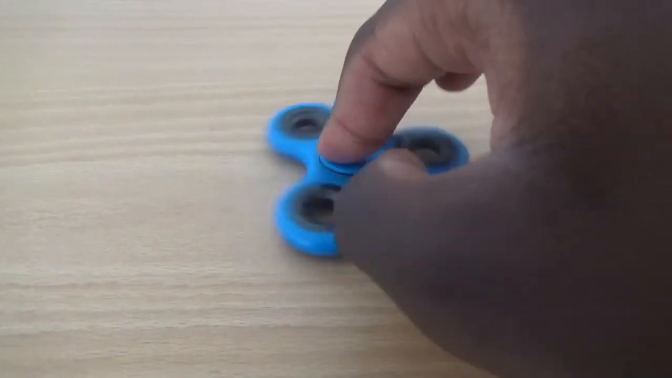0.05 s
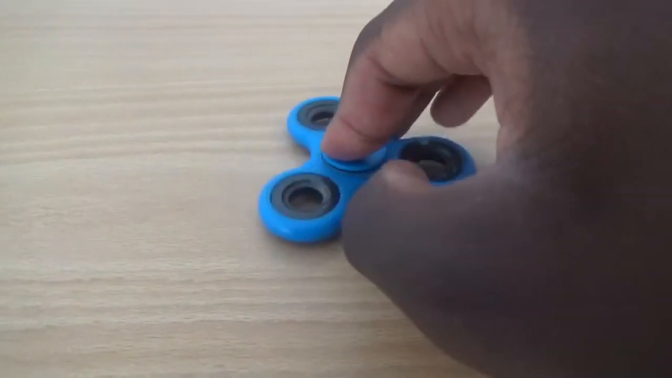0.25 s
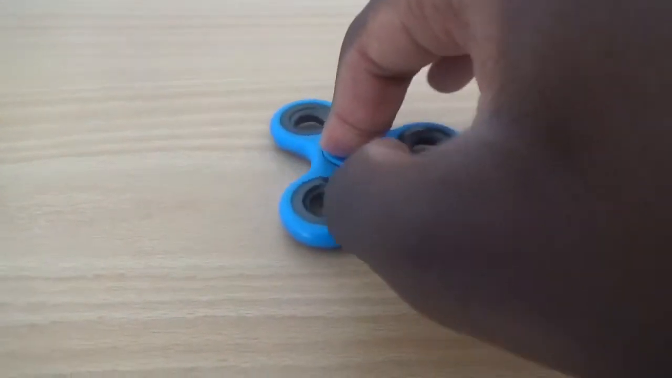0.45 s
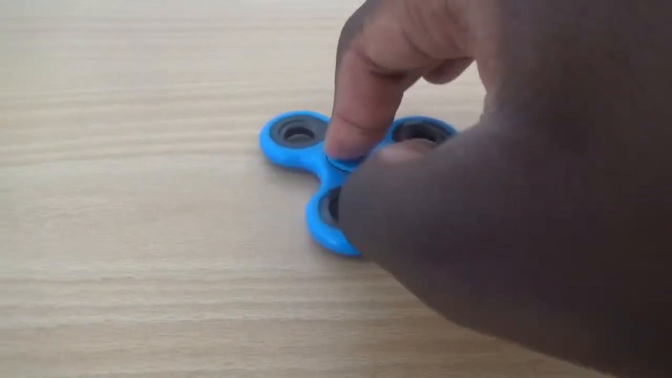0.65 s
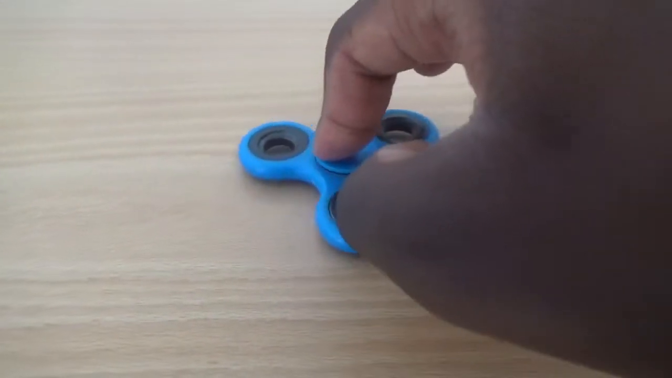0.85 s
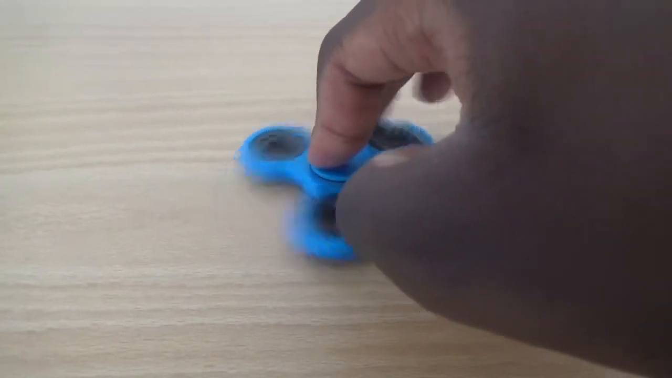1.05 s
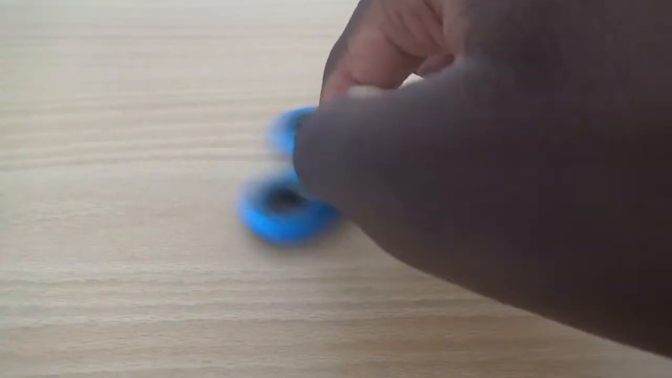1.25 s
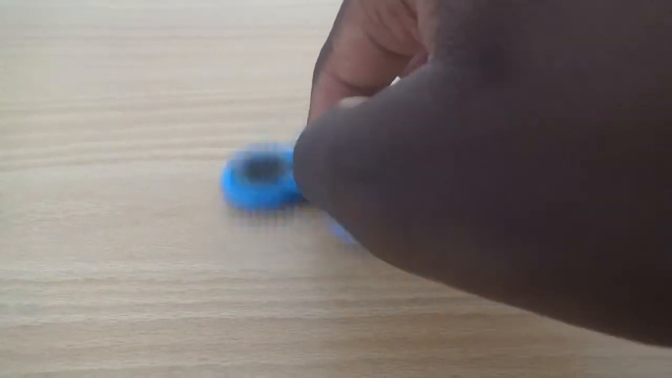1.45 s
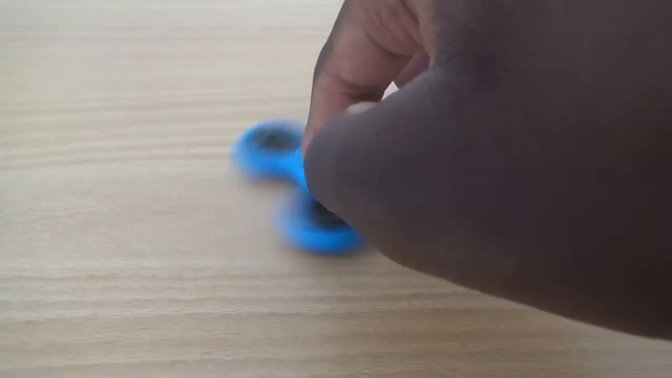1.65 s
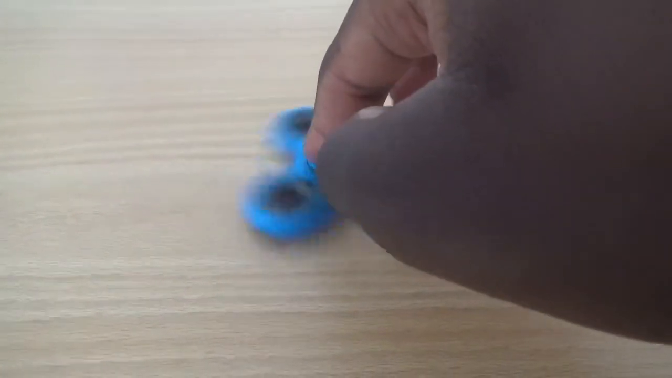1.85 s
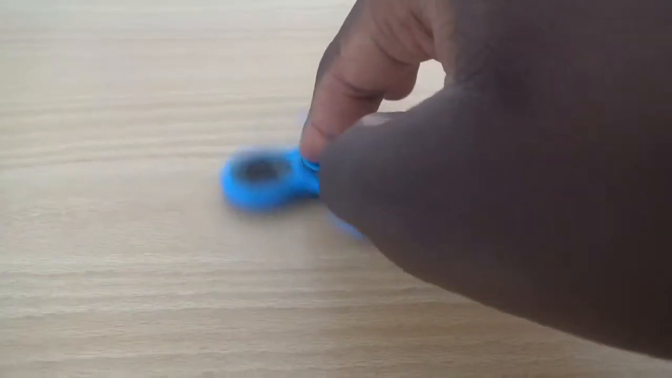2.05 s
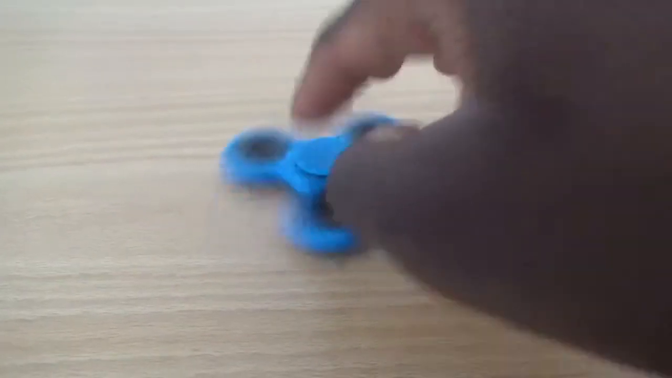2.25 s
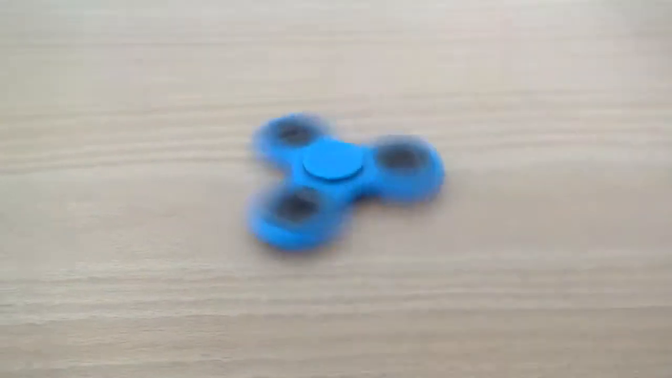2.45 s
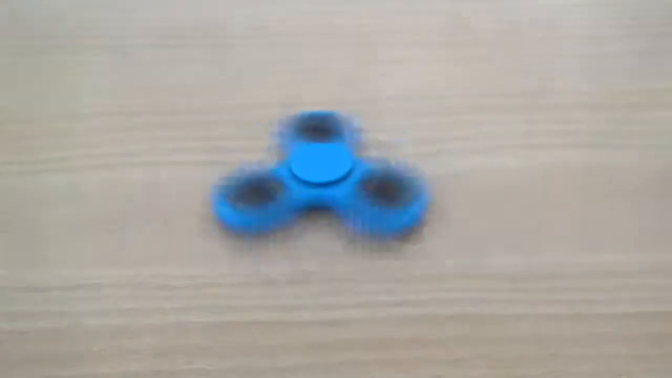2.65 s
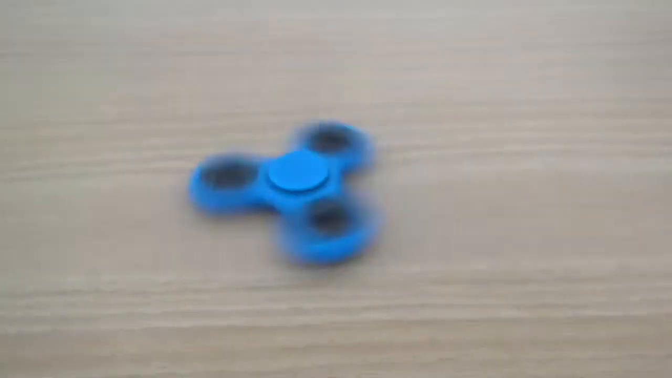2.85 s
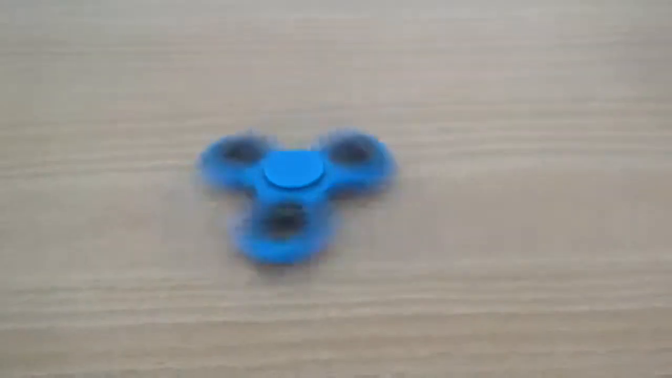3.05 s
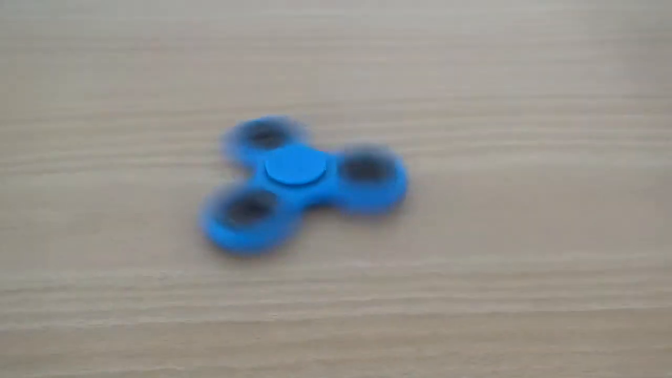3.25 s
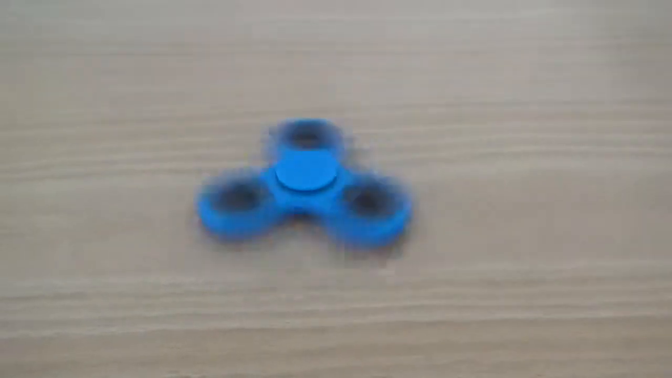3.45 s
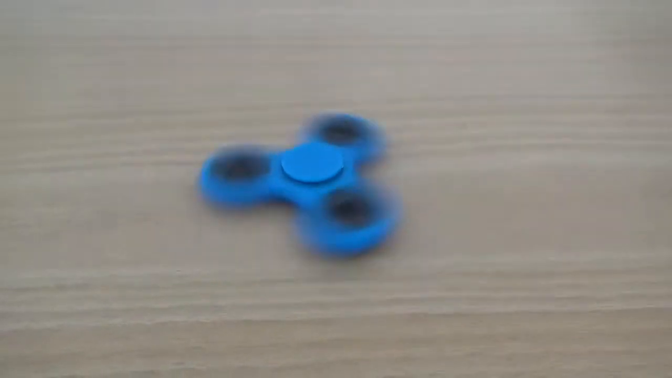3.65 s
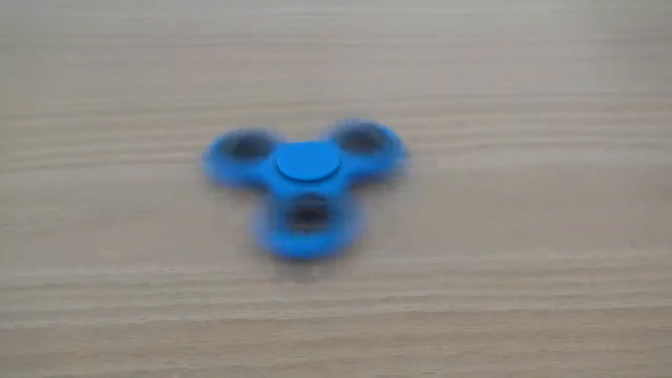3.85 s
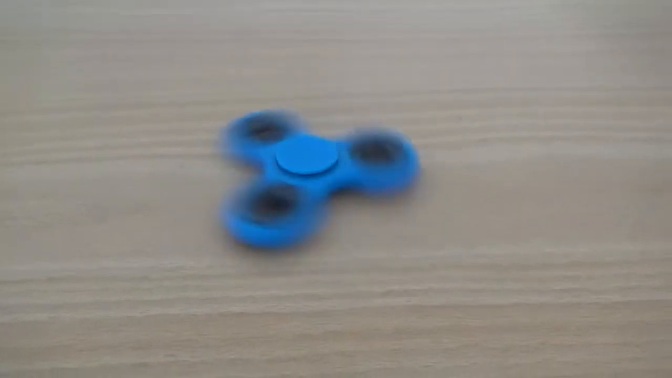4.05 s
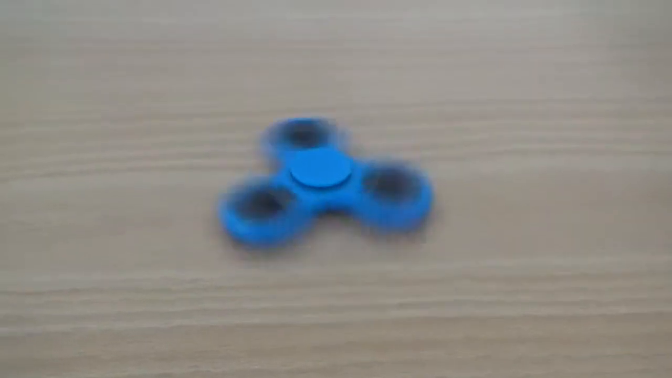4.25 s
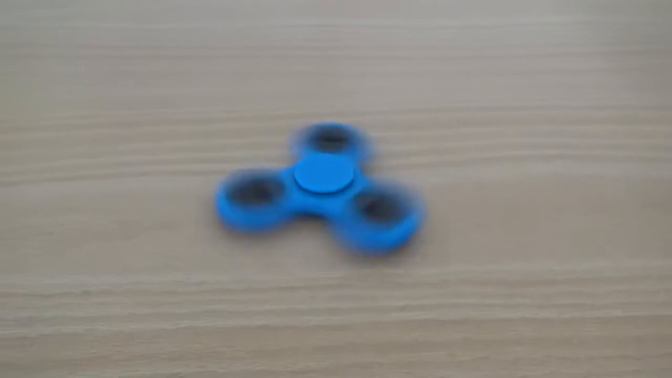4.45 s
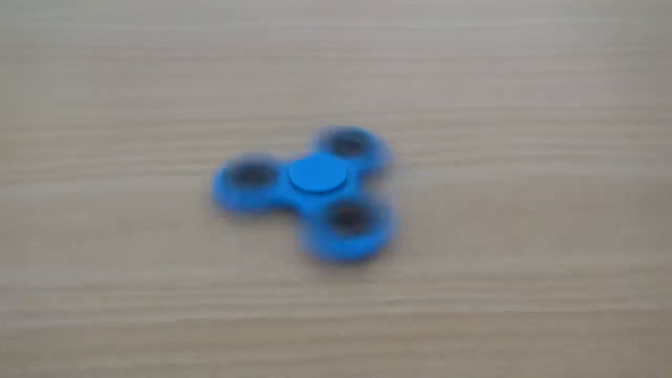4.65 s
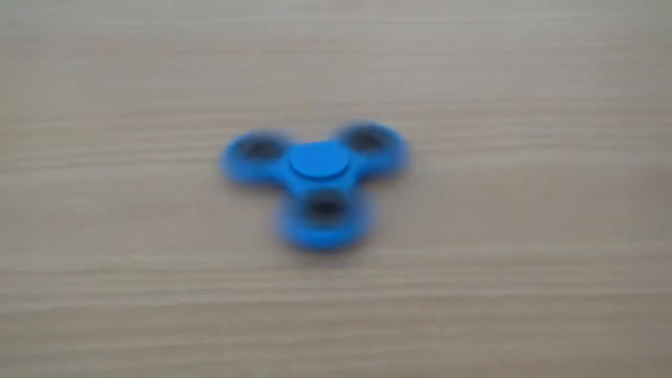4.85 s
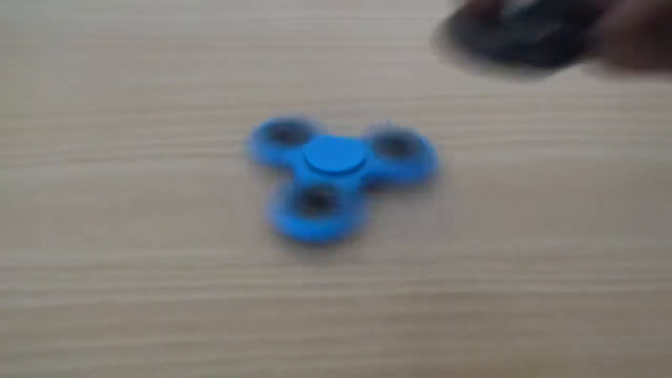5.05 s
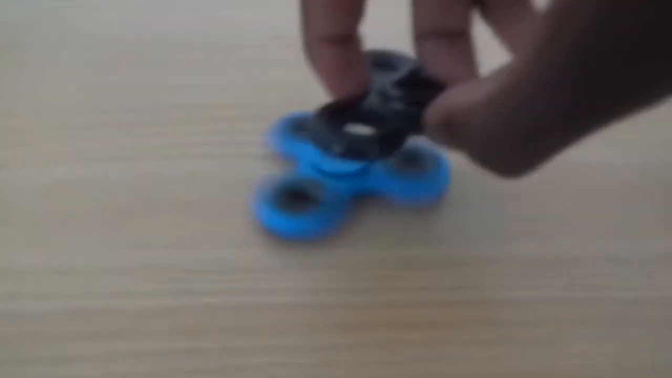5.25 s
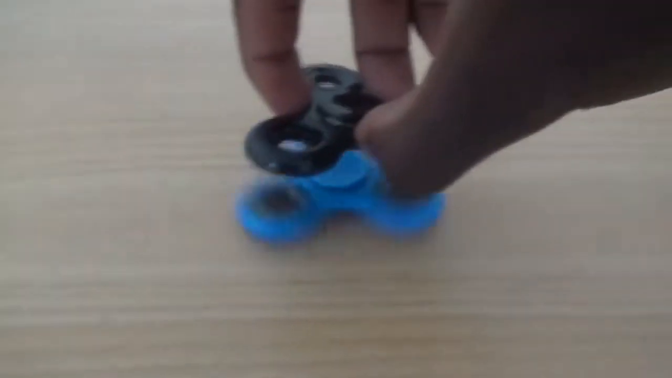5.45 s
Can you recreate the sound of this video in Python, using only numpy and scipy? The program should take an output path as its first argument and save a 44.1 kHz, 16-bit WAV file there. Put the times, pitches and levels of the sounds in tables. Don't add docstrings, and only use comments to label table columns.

```python
import sys
import numpy as np
from scipy import signal
from scipy.fft import rfft, irfft
from scipy.io import wavfile
from scipy.ndimage import uniform_filter1d

SR = 44100
rng = np.random.default_rng(int(sys.argv[2]) if len(sys.argv) > 2 else 0)


def volts_from_db(level):
    exponent = np.asarray(level, float) / 20
    return 10 ** exponent


def wav_out(sig):
    wavfile.write(sys.argv[1], SR, np.round(np.clip(np.atleast_2d(sig).T, -1, 1) * 32767).astype(np.int16))


N = 243431
TIME = np.arange(N) / SR
HZ = np.fft.rfftfreq(N, 1 / SR)

# time_s, pressure_0_to_1, drag_along_wood_0_to_1
FINGER = [
    (0, 1, 0.84),
    (.5, 0.9, 0.8),
    (.9, 0.89, 0.01),
    (2.04, 0.76, 0.02),
    (2.09, 0, 0.26),
    (2.13, 0.98, 0.03),
    (2.22, 0.64, 0),
    (2.32, 0.05, 0.19),
    (5.52, 0.09, 0),
]
# time_s, level_db
RATTLE = [(1.0, -33), (1.06, -17), (1.09, -5), (1.16, -2.5), (1.6, -1), (1.9, -0.5), (2.2, -0.5), (2.45, 1),
          (2.8, 0.5), (3.05, -0.5), (3.3, 0.4), (3.8, 0.5), (4.6, -0.57), (4.9, -1.5), (5.15, 0.05),
          (5.4, 1.5), (5.45, -1), (5.52, -0.5)]
# time_s, change_db, length_s
ROCKS = [(1.03, 22.5, 0.038), (1.154, 3, 0.054), (1.256, 5, 0.093), (1.373, 4.5, 0.037), (1.497, 5, 0.05),
         (1.613, -6.5, 0.22), (1.766, 4.5, 0.11), (1.818, 0.5, .06), (1.9, 0.5, .05), (2.174, 4, 0.047),
         (2.24, -0.5, .04), (2.326, 0.5, 0.046), (3.462, 5, .06), (3.72, 0.5, 0.074), (3.873, 0, .05),
         (4.615, 2.5, 0.046), (4.7, 3, 0.065), (4.856, 1, 0.036), (5.006, 2, 0.046), (5.266, 2, .05),
         (1.95, -6.5, 0.044), (2.02, 3.5, 0.046), (2.427, 2.5, 0.097), (2.66, 4, 0.09), (2.81, 4.5, 0.017),
         (2.954, 5, 0.092), (3.18, 4.5, 0.13), (3.295, 2, 0.072), (3.35, 6, 0.071), (3.518, -3, 0.032),
         (3.606, 5.5, 0.058), (3.96, -4, 0.025), (4.065, 4.5, 0.045), (4.257, 2, 0.15), (4.39, -5, 0.05),
         (4.424, 6.5, 0.021), (4.807, 0.5, 0.044), (5.057, -4, 0.035), (5.125, 4, 0.085),
         (5.398, 3.5, 0.034), (5.443, -5, 0.034), (5.484, 3, .04)]
# pitch_hz, width_hz, finger_on_db, let_go_db
RACE_MODES = [(5140, 1000, -9, -11), (5796, 190, -2, -5), (6174, 280, -1, 0), (6500, 180, 4, -5.5),
              (6800, 210, 0.5, -3), (7220, 390, -1.5, -1), (7720, 220, -2, 5), (8080, 720, -1.5, 3),
              (8610, 300, 0, 0), (8900, 430, -5, -0.5), (9600, 1400, -6, -1), (9950, 160, -3, 0.5),
              (10440, 1020, -6.5, -2), (11020, 230, 4, -8)]
CAP_MODES = [(1378, 36, -4, -3), (1649, 89, -1.5, -5), (1877, 34, -2, -11.5), (2110, 120, -8, -5.5),
             (2273, 55, 1.5, 3), (2580, 140, -10.5, -9), (2860, 340, -16, -12.5), (3000, 440, -8.5, -15.5),
             (4200, 800, -9.5, -10), (4510, 66, -30, -17)]
PANEL_MODES = [(382, 70, -1, -3.5), (425, 37, -9, -5), (532, 21.3, 5.5, 1.5), (599, 26, -2.5, -1),
               (665, 49, -5.5, -10), (747, 30, 4, -1.5), (834, 36, -10, -6), (932.6, 43.6, 0, 0.5),
               (982, 28, -11, -6), (1122, 12, -9, -33)]
TABLE_MODES = [(177.5, 7.5, -24, -16), (212, 7.3, 0, 2.5), (239.5, 14.5, -6.5, 3.5),
               (260.1, 9.9, 3.5, -1.5), (322, 12.3, -8.5, -18), (343.5, 11, -13, -7)]
# pitch_hz, width_hz, finger_on_db, let_go_db
DRAG_MODES = [(205, 26, -12.5, -9), (274, 24, 0, -1), (343, 18, -27, -16)]
# time_s, pitch_hz
RESTING_SPOT = [(1.03, 216), (1.2, 255), (1.95, 250), (2.05, 220), (2.18, 252), (2.7, 241), (2.95, 220),
                (3.15, 243), (3.26, 210), (3.39, 212), (3.46, 256), (3.6, 214), (3.8, 238), (3.95, 212),
                (4.1, 238), (4.24, 218), (4.43, 254), (5.52, 243)]
# time_s, peak_db, pitch_hz, fade_by_60_db_s
TICKS = [(0.196, -39, 8200, 0.0099), (1.0879, -33, 6940, .02), (1.1014, -28.5, 6240, .018),
         (1.199, -25, 8360, .009), (1.26, -26, 10500, .01), (1.3756, -25, 10600, 0.011),
         (1.4331, -27.5, 8360, 0.012), (1.916, -20, 9100, 0.0053), (1.9813, -25, 6880, .012),
         (2.024, -25, 8900, .018), (2.2614, -26.5, 7760, .012), (2.296, -26.5, 10300, 0.016),
         (2.4384, -25, 7970, 0.017), (2.534, -27, 8300, 0.018), (2.5626, -24, 9700, 0.015),
         (2.674, -23.5, 9500, 0.046), (2.776, -29, 9950, 0.046), (2.919, -24, 9000, 0.034),
         (3.2233, -27, 9400, 0.017), (3.585, -26, 7850, 0.028), (3.715, -33, 7950, 0.024),
         (3.7705, -28, 9300, .03), (3.9923, -27.5, 8600, 0.022), (4.179, -25.5, 9600, 0.02),
         (4.43, -25, 10400, 0.016), (4.5535, -29, 9850, .02), (4.582, -27, 8100, 0.02),
         (5.3772, -23, 8500, .014), (5.4015, -22.5, 7800, 0.012), (5.4804, -28, 7550, .023)]
# time_s, peak_db, pitch_hz
TAPS = [(1.9064, -24, 8420), (2.381, -26, 10400), (2.5958, -24, 7950), (2.7139, -29, 7860),
        (2.7309, -25, 7890), (2.7965, -21.5, 9920), (2.8774, -31, 7820), (3.0719, -28, 7810),
        (3.3373, -25, 7780), (3.55, -24, 7720), (3.6129, -35, 8540), (3.6239, -24, 10400),
        (3.6875, -28, 7820), (3.8731, -27, 7910), (3.8935, -26, 9220), (3.9419, -29, 7840),
        (4.12, -24, 7740), (4.25, -27, 7800), (4.2697, -25, 7770), (4.3944, -25, 8150), (4.5072, -25, 8360),
        (4.6189, -29, 7890), (4.6324, -25, 8190), (4.6803, -29, 8130), (4.7077, -33, 8300),
        (4.8354, -30, 8080), (4.9486, -30, 7700), (4.9576, -28, 8200), (5.0814, -29, 9820),
        (5.2086, -27, 7700), (5.3043, -24, 7700), (5.3542, -31, 8670), (5.366, -24, 8570)]
# time_s, peak_db, pitch_hz, width_hz, fade_by_60_db_s
CLACKS = [(.9128, -51, 6000, 3000, 0.013), (1.0166, -49, 6470, 2000, .02), (1.0294, -53, 6600, 2000, .02),
          (.061, -37.5, 4040, 900, 0.017), (.062, -42, 3000, 1200, 0.024), (1.145, -30.5, 9500, 910, 0.015),
          (1.755, -51, 6560, 500, 0.034), (1.322, -34.5, 4560, 695, 0.024), (2.055, -35, 4460, 1200, .03),
          (3.219, -34, 2240, 300, 0.08), (3.345, -31, 4550, 2000, 0.0089),
          (3.588, -23.5, 5400, 2590, 0.012), (2.677, -30.5, 3900, 1800, 0.017),
          (2.463, -23, 8000, 5000, 0.0048), (3.713, -32.5, 6800, 600, 0.015),
          (3.772, -32, 6200, 400, 0.037), (4.144, -32.5, 2240, 200, 0.037), (4.43, -34, 4240, 2040, 0.013),
          (5.148, -37, 3000, 2500, 0.02), (5.403, -30, 6500, 900, 0.028), (5.482, -31.5, 6500, 800, .03)]
# time_s, peak_db, pitch_hz, width_hz, fade_by_60_db_s
KNOCKS = [(1.02, -39, 215, 50, 0.052), (1.2, -42, 242, 50, .04), (1.8, -33, 260, 73, 0.0087),
          (3.1452, -20, 463, 530, 0.0094), (3.1462, -33, 1020, 790, .008), (3.591, -41, 1850, 300, .03),
          (1.15, -32, 560, 160, 0.099), (2.9, -34, 340, 51, 0.16), (3.165, -33, 452, 150, 0.069),
          (3.22, -37, 390, 120, 0.087), (0.093, -36, 288, 61, 0.045), (0.0102, -41, 287, 79, 0.042),
          (3.131, -30, 174, 73, 0.029), (3.14, -44.5, 76, 40, 0.23), (3.185, -50, 69.6, 40, .08),
          (4.03, -52, 70, 40, 0.07), (3.66, -36.5, 150, 50, 0.091), (4.15, -38, 173, 40, .12),
          (2.1, -41, 124, 65, 0.051), (3.343, -27, 205, 62, 0.037), (3.588, -27.5, 205, 62, 0.025),
          (4.42, -32, 252, 55, 0.01), (6.2, -27, 230, 55, .01)]
# time_s, pitch_hz, level_db
HAND_GAP = [
    (4.98, 5450, -73),
    (5.03, 5250, -59),
    (5.1, 4800, -61),
    (5.2, 4550, -63),
    (5.35, 4470, -66),
    (5.45, 4380, -78),
]
# time_s, level_db
JOLTS = [(2.27, -51), (2.48, -60), (3.14, -40.5), (3.23, -47), (3.4, -49), (3.5, -44), (3.67, -41),
         (3.94, -49), (4.05, -53), (4.22, -45.5), (4.41, -54), (5.17, -54)]
# pitch_hz, difference_db
LEAN_DB = [(300, 0), (800, 0), (1150, -2.5), (1500, .5), (3500, 1), (5850, 7), (7300, 1.8), (8800, .2)]
# pitch_hz, lead_radians
LEAD = [(100, 0), (1000, -.2), (2000, .1), (5200, .7), (6000, -.8), (6400, -.55), (8200, -.35),
        (8450, -.07)]
# pitch_hz, likeness_0_to_1
SPINNER_ALIKE = [(300, .997), (700, .9), (1200, .45), (2300, .8), (4300, .74), (5750, .5), (6200, .82),
                 (8600, .97)]
# start_s, rise_s, hold_s, fall_s, pitch_hz, level_db, left_minus_right_db
LENS_STEP = [
    (0, 0.0055, .0005, .0025, 3830, -59, -2),
    (0, 0.003, 0.0088, 0.0042, 4190, -54, 3.5),
    (.005, 0.007, 0.0017, .005, 2105, -59, 14),
]
# time_s, level_db
LENS_LEVEL = [(.09, -3), (.13, 1), (1.0, -0.5), (1.2, -1), (2.0, 1), (3.0, -2), (4.0, -5), (5.5, -1)]
# pitch_hz, level_db
FAN = [(37.6, -65.5), (75, -69), (88.3, -71), (176.5, -61.5), (264.8, -65), (353, -62), (447, -70),
       (541, -71), (728, -69), (803, -66)]
# pitch_hz, level_db_per_hz
AIR = [(25, -4), (50, -18), (90, -19.5), (150, -22), (300, -4), (600, 0.5), (950, 5), (1100, -45),
       (1600, -11.5), (2600, -6), (3400, -12.5), (6000, -15.5), (11000, -24.5)]
# pitch_hz, likeness_0_to_1
AIR_ALIKE = [(60, 0), (270, 0.2), (570, 0.2), (1200, 0.9), (2500, 0), (5300, 0.02), (11000, 0.9)]
# pitch_hz, width_hz, level_db
ROOM_RING = [(790, 210, -63), (900, 49, -63.5), (1362, 65, -62)]


def spinner():
    s, *columns = np.transpose(FINGER)
    press, drag = (np.clip(np.interp(TIME, s, column), 0, 1) for column in columns)
    flurry = volts_from_db(0.47 * walk(30.16))
    balls = rattle(1500, 2.73, 16, flurry, contact_s=0.00017)

    race = body(RACE_MODES, balls + .5, press, 2.0, count=2)
    cap = body(CAP_MODES, balls + 1.14, press, 2.0)
    panel = body(PANEL_MODES, balls + 2.2, press, 1.0)
    spot_hz = np.interp(TIME, *np.transpose(RESTING_SPOT))
    resting = body(TABLE_MODES, balls + 5.3, press, 0.37, near_hz=spot_hz)
    sliding = body(DRAG_MODES, 1, press, 1.2)
    table = (1 - drag) * resting + drag * sliding

    out = feed(press, free_db=-43.5, held_db=-3.5, share=0.2, nudge_db=-64, rest_db=-74.5) * race
    out = out + feed(press, free_db=-48.5, held_db=-3.5, share=0.06, nudge_db=-83, rest_db=-66) * cap
    out = out + feed(press, free_db=-47.5, held_db=8.5, share=0.12, nudge_db=-51, rest_db=-59.5) * panel
    out = out + feed(press, free_db=-38.5, held_db=0, share=1.2, nudge_db=-42, rest_db=-65) * table
    out = out + ticks(press)
    out = out + strikes(CLACKS, True, rise_s=0.0013)
    out = out + strikes(KNOCKS, False, rise_s=0.00057)
    return out + hollow(balls + 1.1)


def rattle(per_s, scatter_db, hardest_db, flurry, contact_s):
    size_db = np.minimum(scatter_db * rng.exponential(size=N), hardest_db)
    hits = (rng.random(N) < per_s / SR) * volts_from_db(size_db)
    contact = np.exp(-.5 * (np.arange(-128, 129) / (contact_s * SR)) ** 2)
    return unit(np.abs(signal.fftconvolve(hits, contact, "same")) * flurry)


def body(modes, force, press, flicker_db, count=1, near_hz=None):
    held, free = 0, 0
    for hz, width, held_db, free_db in modes:
        tone = force * volts_from_db(flicker_db * walk(25.02)) * rng.standard_normal(N)
        for _ in range(count):
            tone = ring(tone, hz, width)
        if near_hz is not None and hz < 300:
            distance = (hz - near_hz) / 40
            tone = tone * volts_from_db(-7 * np.minimum(distance ** 2, 1))
        held = held + volts_from_db(held_db) * tone
        free = free + volts_from_db(free_db) * tone
    return press * unit(held) + (1 - press) * unit(free)


def feed(press, free_db, held_db, share, nudge_db, rest_db):
    rock_db = sum(db * np.exp(-(2 * (TIME - s) / length) ** 2) for s, db, length in ROCKS)
    run_db = np.interp(TIME, *np.transpose(RATTLE), left=-60)
    spin_db = run_db + free_db + held_db * press + share * rock_db
    nudge_hold_s, nudge_fade_db_per_s = .1, 85
    nudge_db = nudge_db - nudge_fade_db_per_s * np.maximum(TIME - nudge_hold_s, 0)
    return np.sqrt(volts_from_db(spin_db) ** 2 + volts_from_db(nudge_db) ** 2 + volts_from_db(rest_db) ** 2)


def ticks(press):
    width_hz, tap_fade_s, tap_gain_db = 2700, .008, -2
    rows = [(s, db, hz, width_hz, fade_s) for s, db, hz, fade_s in TICKS]
    rows += [(s, db + tap_gain_db, hz, width_hz, tap_fade_s) for s, db, hz in TAPS]
    return volts_from_db(1.0) * through(RACE_MODES, strikes(rows, True, rise_s=.001), press)


def strikes(rows, noisy, rise_s):
    out, t = np.zeros(N + SR), TIME[:4096]
    grits = rng.standard_normal((len(rows), len(t)))
    for (s, db, hz, width, fade_s), grit in zip(rows, grits):
        swell = 1 - np.exp(-(t / rise_s) ** 2)
        decay = np.exp(-np.log(1000) * t / fade_s)
        push = swell * decay * (grit if noisy else -np.sin(2 * np.pi * hz * t))
        burst = ring(ring(push, hz, width), hz, 2.4 * width)
        start = int((s - rise_s / 2) * SR)
        out[start:start + len(t)] += volts_from_db(db) * burst / np.abs(burst).max()
    return out[:N]


def through(modes, x, press):
    out = 0
    for k, (hz, width, held_db, free_db) in enumerate(modes):
        gain = press * volts_from_db(held_db) + (1 - press) * volts_from_db(free_db)
        out = out + (-1) ** k * gain * ring(x, hz, width)
    return out


def hollow(force):
    s, hz, db = np.transpose(HAND_GAP)
    noise = force * rng.standard_normal((2, N))
    slow = unit(uniform_filter1d(uniform_filter1d(noise, size=70), size=70))
    turn = 2 * np.pi * np.cumsum(np.interp(TIME, s, hz)) / SR
    level = volts_from_db(np.interp(TIME, s, db, left=-120, right=-120))
    return level * (slow[0] * np.cos(turn) + slow[1] * np.sin(turn))


def microphones(x):
    alike = np.clip(over_hz(SPINNER_ALIKE), 0, 1)
    t = TIME[:8192]
    tail = rng.standard_normal(len(t)) * np.exp(-np.log(1000) * t / 0.13)
    echo = rfft(tail / np.sqrt(np.sum(tail ** 2)), N)
    wet = np.sqrt((1 - alike) / (1 + alike)) * echo
    half = volts_from_db(over_hz(LEAN_DB) / 2) * np.exp(.5j * over_hz(LEAD))
    return irfft(rfft(x) * np.array([(1 + wet) * half, (1 - wet) / half]), N)


def frame():
    rise_s, fade_db_per_s, rest_db = 0.022, 112, -62
    mid, side = ring(ring(rng.standard_normal((2, N)), 114, 180), 170, 220)
    power = volts_from_db(rest_db) ** 2
    for s, db in JOLTS:
        rise = np.clip((TIME - s) / rise_s + 1, 0, 1)
        fade_db = fade_db_per_s * np.maximum(TIME - s, 0)
        power = power + (rise * volts_from_db(db - fade_db)) ** 2
    return np.sqrt(power) * unit(np.array([mid + 0.081 * side, mid - 0.24 * side]))


def lens():
    first_step_s, frame_s = .0888, .04
    step, t = np.divmod(TIME - first_step_s, frame_s)
    level_db = np.interp(TIME, *np.transpose(LENS_LEVEL)) + .9 * walk(25)
    direction = (step >= 0) * (1 - 2 * (step % 2))
    out = 0
    for start, rise, hold, fall, hz, db, pan_db in LENS_STEP:
        shape = np.interp(t - start, np.cumsum([0, rise, hold, fall]), [0.23, 0.72, 0.52, 0.0043])
        gain = volts_from_db(db + np.array([[pan_db], [-pan_db]]) / 2)
        out = out + gain * np.sqrt(2) * shape * np.sin(2 * np.pi * hz * t)
    return direction * volts_from_db(level_db) * out


def fan():
    out = 0
    for hz, db in FAN:
        level = volts_from_db(db + 1.4 * walk(5.9))
        turn = 2 * np.pi * np.cumsum(hz + 0.641 * walk(2.98)) / SR
        out = out + level * np.sqrt(2) * np.sin(turn)
    return out


def room():
    alike = np.clip(over_hz(AIR_ALIKE), 0, 1) ** .5
    noise = rfft(rng.standard_normal((2, N))) * volts_from_db(over_hz(AIR))
    mid, side = noise * np.sqrt([1 + alike, 1 - alike])
    out = volts_from_db(-55.5) * unit(irfft(np.array([mid + side, mid - side]), N))
    for hz, width, db in ROOM_RING:
        out = out + volts_from_db(db) * unit(ring(rng.standard_normal((2, N)), hz, width))
    return out


def unit(x):
    return x / np.sqrt(np.mean(x ** 2))


def over_hz(table):
    hz, value = np.transpose(table)
    return np.interp(np.log(HZ + 1), np.log(hz + 1), value)


def ring(x, hz, width):
    return signal.lfilter(*signal.iirpeak(min(hz, SR / 2.1), hz / width, fs=SR), x)


def walk(rate):
    k = int(SR / rate)
    held = np.repeat(rng.standard_normal(N // k + 1), k)
    return unit(uniform_filter1d(uniform_filter1d(held, k), k)[:N])


def scene():
    return microphones(spinner()) + frame() + lens() + fan() + room()


def low_pass(x):
    return signal.sosfilt(signal.butter(12, 11900, fs=SR, output="sos"), x)


def record(dry):
    top = signal.ellip(11, .2, 58, 10940, fs=SR, output="sos")
    mix = signal.sosfilt(top, dry)
    return low_pass(mix)


dry = scene()
out = record(dry)
wav_out(out)
```